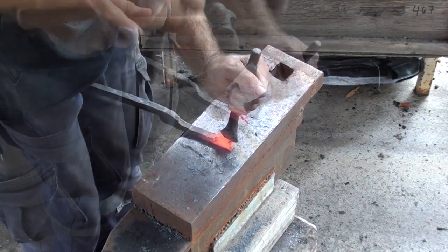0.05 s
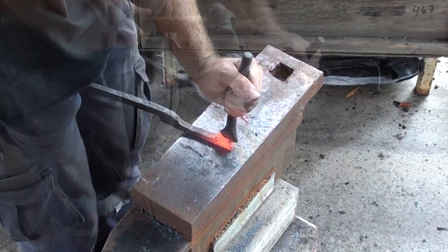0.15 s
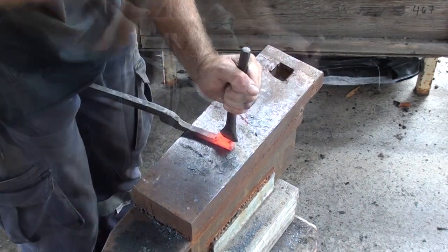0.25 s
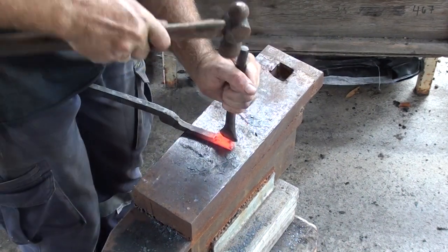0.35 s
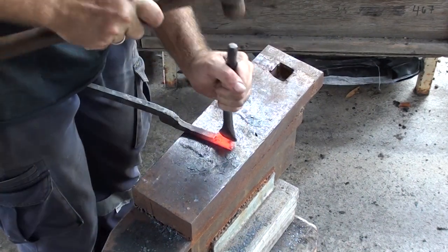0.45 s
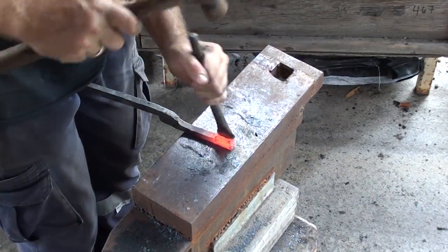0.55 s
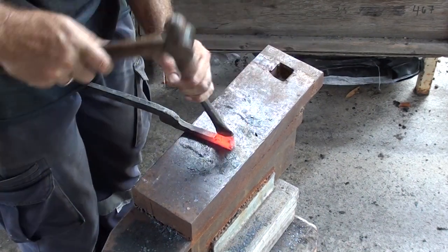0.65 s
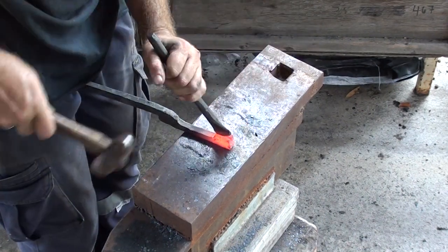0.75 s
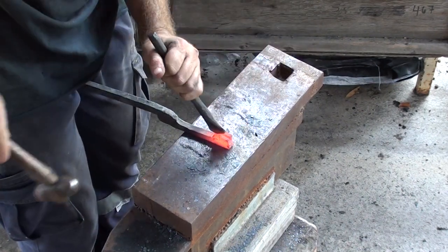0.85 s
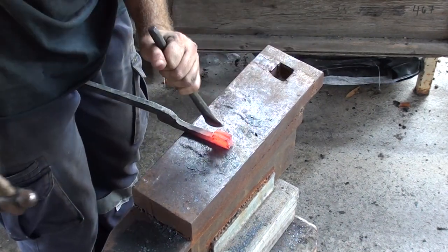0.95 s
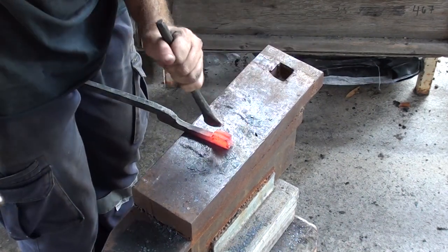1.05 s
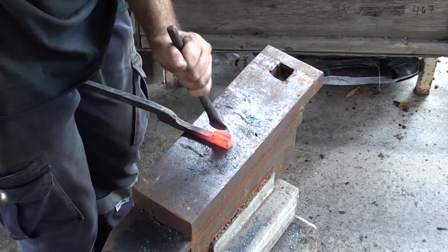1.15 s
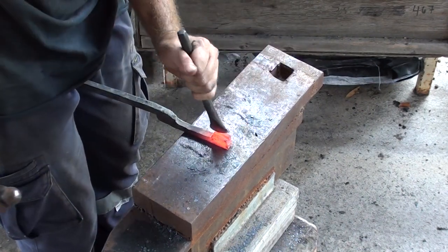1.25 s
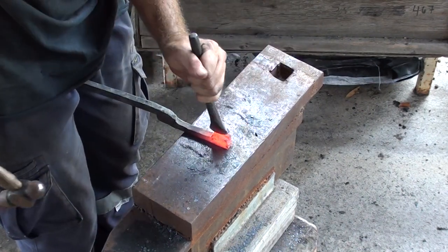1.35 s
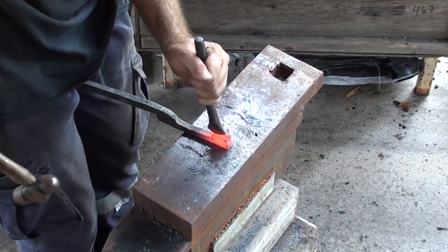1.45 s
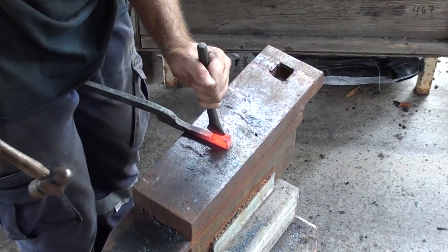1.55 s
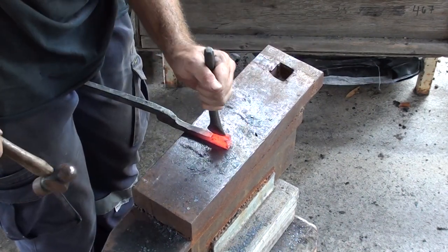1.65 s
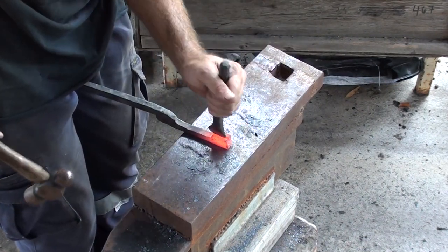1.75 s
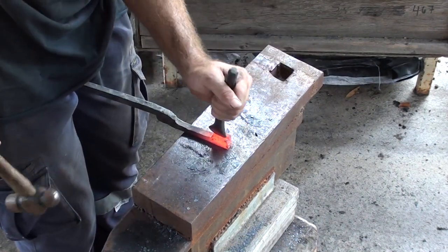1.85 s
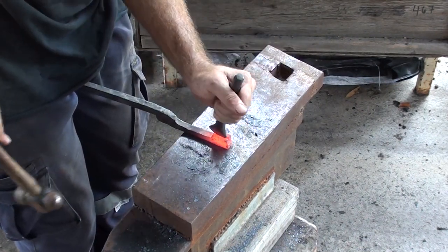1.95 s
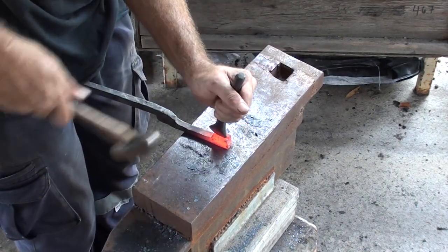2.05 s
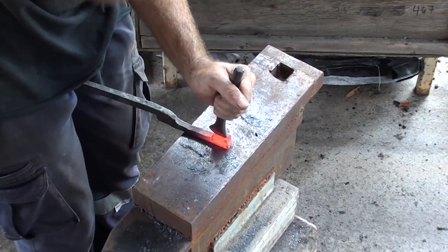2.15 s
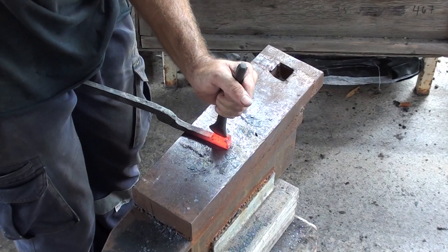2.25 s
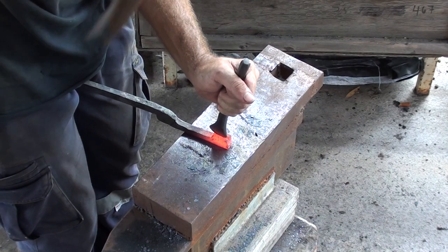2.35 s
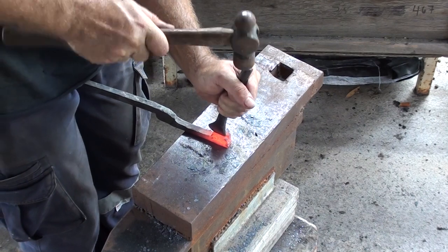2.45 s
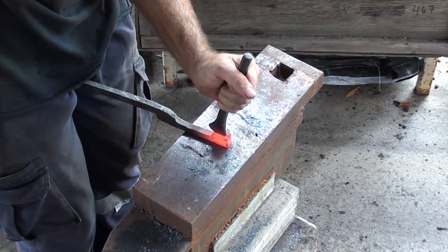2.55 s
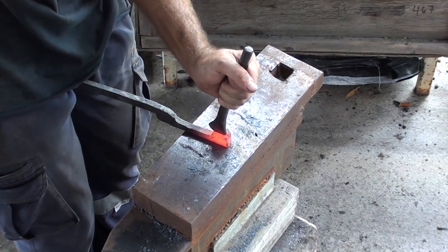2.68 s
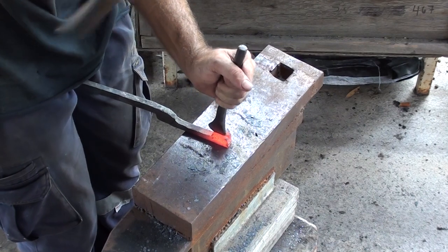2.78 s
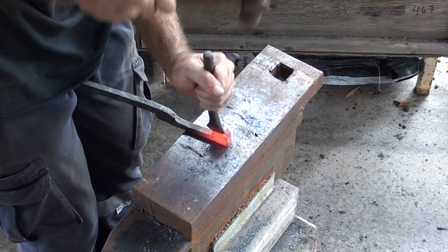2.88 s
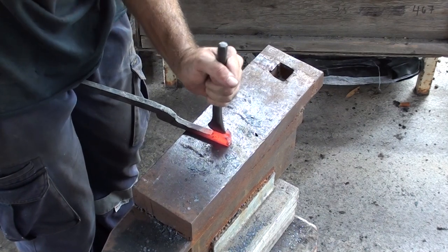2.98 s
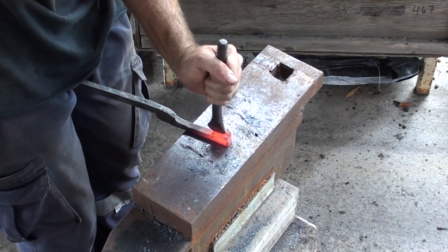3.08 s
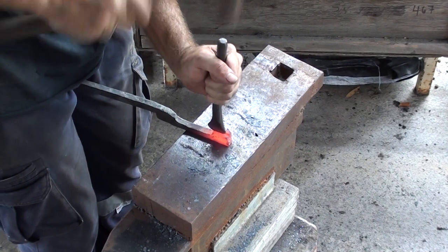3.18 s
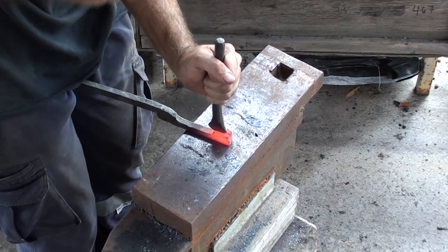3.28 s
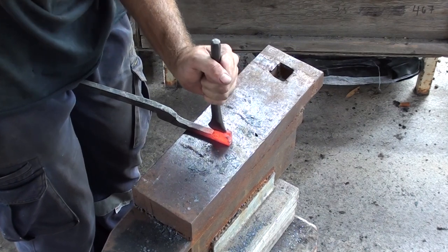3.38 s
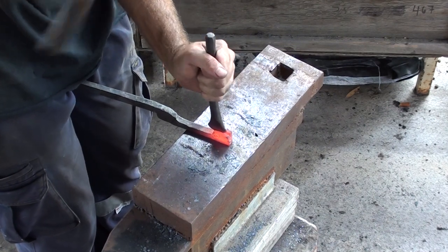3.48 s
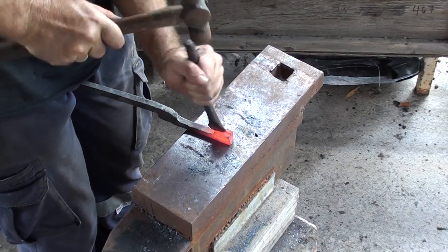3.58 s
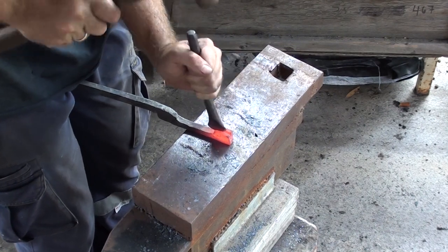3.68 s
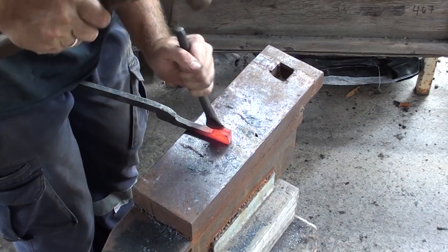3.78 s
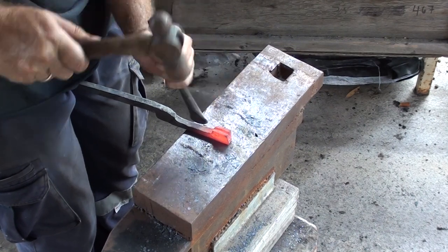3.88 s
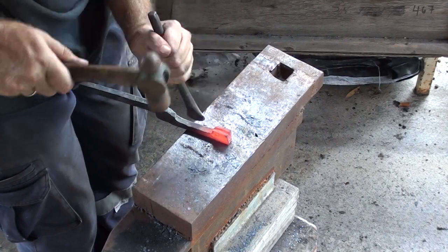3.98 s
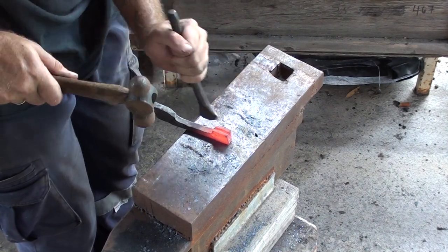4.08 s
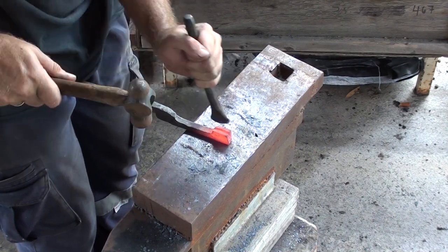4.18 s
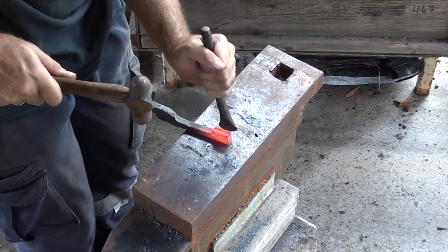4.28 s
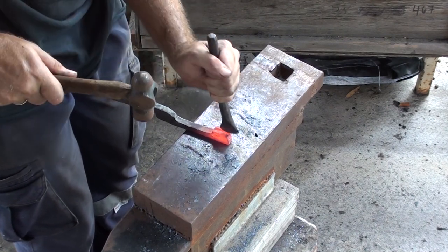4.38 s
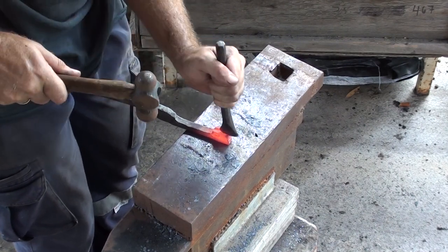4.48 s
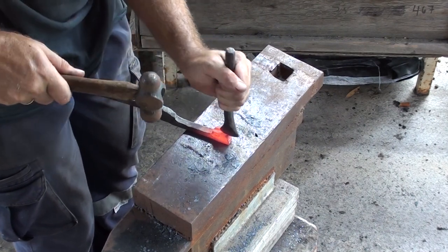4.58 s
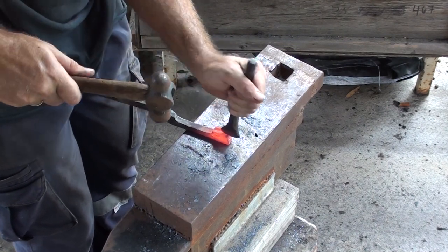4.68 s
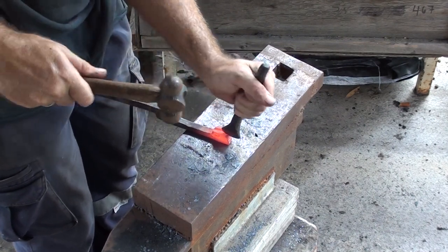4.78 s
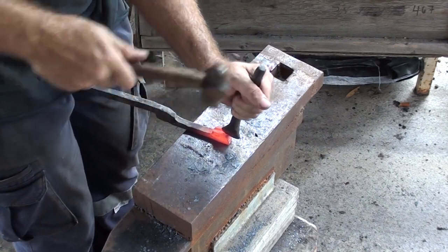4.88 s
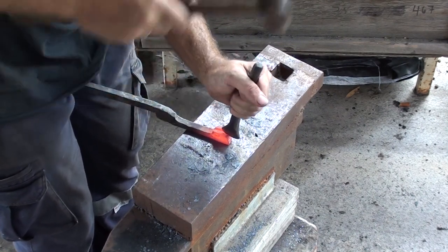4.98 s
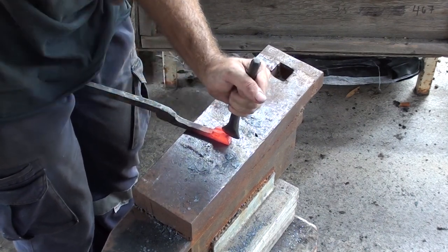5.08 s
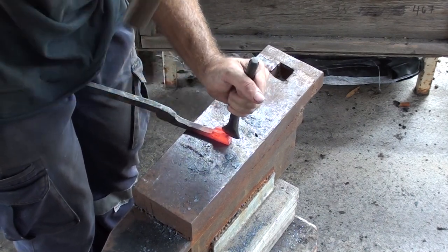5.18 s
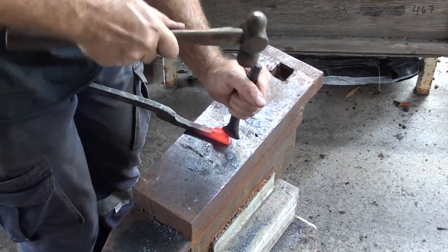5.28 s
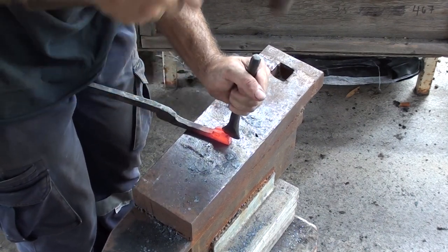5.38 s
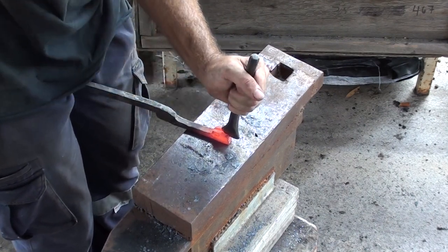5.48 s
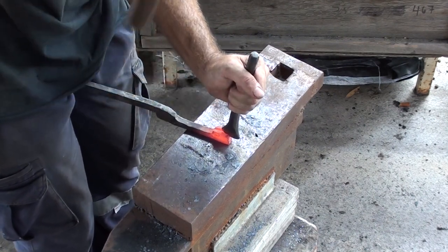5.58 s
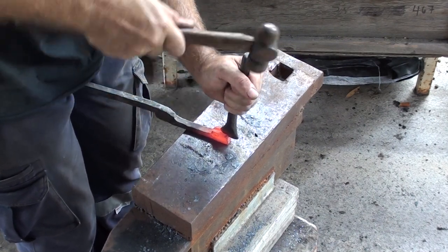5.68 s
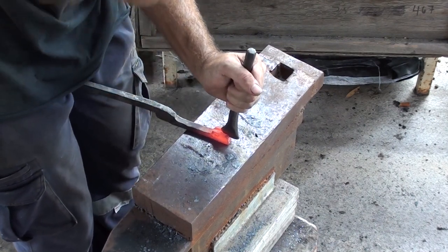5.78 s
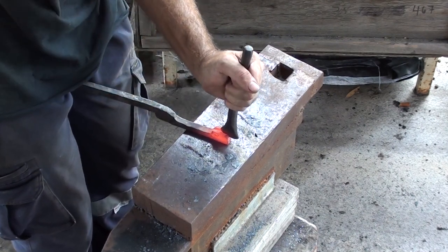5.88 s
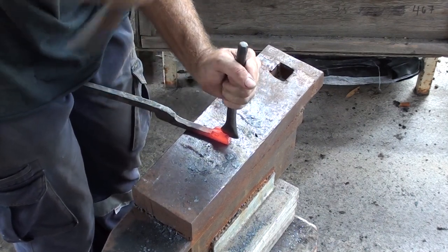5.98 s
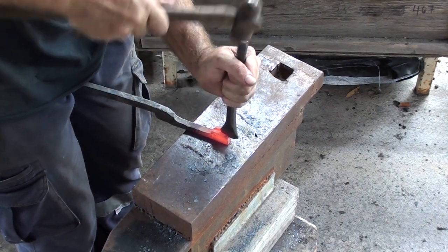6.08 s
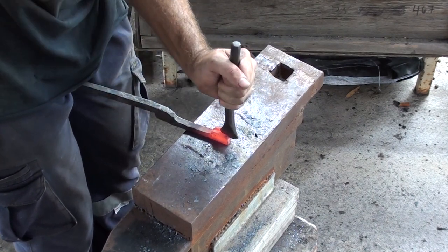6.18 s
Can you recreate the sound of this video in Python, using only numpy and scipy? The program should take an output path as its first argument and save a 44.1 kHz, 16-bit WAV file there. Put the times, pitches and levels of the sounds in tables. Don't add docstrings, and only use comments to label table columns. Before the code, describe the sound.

In a hard-walled workshop, a hammer hits a chisel on hot steel and anvil. Two loud ringing blows open, then a pause with tiny squeaks, light taps and soft drags as the chisel is repositioned. Four evenly spaced blows follow, another pause with faint knocks, then three more. Each crack echoes briefly. High insect chorus, low room hiss and a slowly growing blower hum lie behind. Close stereo microphone, heavily limited on the blows.

```python
import sys
import numpy as np
from scipy import signal
from scipy.fft import rfft, irfft, next_fast_len
from scipy.io import wavfile
from scipy.ndimage import uniform_filter1d

SR = 44100
rng = np.random.default_rng(int(sys.argv[2]) if len(sys.argv) > 2 else 0)


def decibels_to_gain(level_db):
    exponent = np.asarray(level_db, float) / 20
    return 10 ** exponent


def wav_record(signal):
    frames = np.transpose(np.atleast_2d(signal))
    bounded = np.clip(frames, -1, 1)
    quanta = np.round(bounded * 32767).astype(np.int16)
    wavfile.write(sys.argv[1], SR, quanta)


N = 275179
LEAD = 4410


def hammer():
    # start in seconds, strength in dB, then dB above usual passed into the anvil,
    # along the chisel and across the chisel.
    blows = [
        (-.012, -2, 5, 2, -4.5),
        (0.353, -4.5, 8.5, -2.5, -8),
        (2.476, -1.5, -0.5, 4, 6),
        (2.862, -2.5, -4, -3, -20.5),
        (3.231, -5, -5.5, -13.5, -17.5),
        (3.585, -5, 6, 0.5, -4.5),
        (5.309, -4, -1.5, 16, 9),
        (5.691, -4.5, 4.5, -10, -10.5),
        (6.064, -3.5, -0.5, 2, -17),
    ]
    rings, mid, side = np.zeros((3, N + LEAD))
    t = np.arange(SR) / SR
    for start, strength_db, *landing_db in blows:
        force = decibels_to_gain(strength_db + 6.5) * np.minimum(t / 0.00045, 1)
        crack, echoes = crack_and_echoes(landing_db, t)
        sustain, pairs = paired_rings(landing_db, t)
        add(rings, start, force * (pairs + overtones(t)))
        add(mid, start, force * (crack + echoes[0] + sustain))
        add(side, start, force * (echoes[1] + decibels_to_gain(-22) * sustain))
    return shop(rings, wet_db=-4.5) + spread(mid[LEAD:], side[LEAD:])


def crack_and_echoes(landing_db, t):
    # frequency in Hz, level in dB per Hz.
    crack_colour = [(60, -33), (130, -17), (250, -27.5), (480, -10), (850, -6.5), (1500, -13.5),
                    (2050, 1.5), (2700, -5), (3500, -1), (5200, -11), (7200, 2.5), (10500, -11),
                    (13500, -14.5), (15500, -33), (16500, -36)]
    # centre in Hz, half width in Hz.
    bands = [(3870, 360), (5286, 670), (6850, 120), (10800, 320), (8700, 600)]
    # usual level in dB, then the share (no unit)
    band_shares = [(1.3, -0.38, .02, 0.14), (9, .1, 0.15, -0.23), (3.4, -0.051, .01, 0.55),
                   (5, -0.21, 0.89, -0.54), (1.5, -0.16, 0.65, -0.45)]
    hz = np.geomspace(50, 20000, num=120)
    shade = read(crack_colour, hz)
    for band_db, (centre_hz, half_width_hz) in zip(np.dot(band_shares, [1] + landing_db), bands):
        shade = shade + band_db * np.exp(-((hz - centre_hz) / half_width_hz) ** 2)
    brighter = np.column_stack([hz, shade + 14 * hz / 1e4])
    crack = evened(colour(rng.standard_normal(SR), brighter))
    crack_t60 = 0.016
    return crack * decibels_to_gain(5.5 - 60 * t / crack_t60), tail(np.column_stack([hz, shade]))


def paired_rings(landing_db, t):
    ring_hz = [581, 1917, 2396, 8797, 1258, 1695, 3866, 10900]
    # usual level in dB, seconds to fall by 60 dB, then the partner's distance above in Hz,
    # its level in dB and its seconds to fall by 60 dB.
    ring_pairs = [(-20.5, 0.57, -3.5, 5, 0.32), (-5, .42, 1.55, -1, .44), (-13.5, 0.57, -3, 9, 0.3),
                  (-10, 0.3, -24, -4, 0.27), (-16.5, 0.17, -17, -7, 0.15), (-14.5, 0.078, -15, 0, 0.047),
                  (-19, 0.34, -3.5, 5.5, 0.17), (-10, 0.11, 53, -22, 0.11)]
    ring_shares = [(-0.041, -0.13, 0.091), (0.065, -0.26, 0.37), (0.69, -0.15, 0.091), (0.073, 0.99, -0.28),
                   (-0.1, 0.11, -0.1), (-0.63, 0.081, 0.29), (0.13, -0.22, 0.13), (0.26, 0.089, -0.25)]
    bloom_s = [0.035, 0.05, 0.054, 0.0013]
    usual_db, t60, split_hz, partner_db, partner_t60 = np.transpose(ring_pairs)[:, :, None]
    turns = np.transpose([ring_hz]) * t + rng.random((len(ring_pairs), 1))
    pairs = decibels_to_gain(-60 * t / t60) * np.sin(2 * np.pi * turns)
    pairs += decibels_to_gain(partner_db - 60 * t / partner_t60) * np.sin(2 * np.pi * (turns + split_hz * t))
    pairs *= decibels_to_gain(usual_db + np.dot(ring_shares, landing_db)[:, None])
    swell = 1 - np.exp(-t / np.transpose([bloom_s]))
    return (pairs[:4] * swell).sum(0), pairs[4:].sum(0)


def overtones(t):
    overtone_hz = [461, 532, 887, 951, 2020, 2082, 2294, 2853, 3403, 3655, 5089, 6800]
    # level in dB, seconds to fall by 60 dB.
    overtone_rings = [(-29.5, 0.15), (-30, 0.11), (-22, 0.23), (-10.5, 0.11), (-13, 0.063), (-11.5, 0.18),
                      (-21, 0.28), (-48, 0.057), (2, 0.012), (-11, 0.079), (-15, 0.24), (-44, 0.05)]
    return ring(overtone_hz, *np.transpose(overtone_rings), t)


def taps():
    # start in seconds, level of the lower rings, upper ring and edge in dB.
    knocks = [
        (1.29, -29, -46, -32),
        (1.295, -25, -44, -19.5),
        (1.307, -32, -30.5, -31),
        (1.52, -30.5, -50, -25),
        (1.522, -33.5, -45, -44),
        (4.417, -27, -37, -26),
        (4.421, -25, -50, -33),
        (4.498, -39, -44, -33.5),
        (4.51, -30, -45, -48),
    ]
    tap_hz = [420, 982, 1265, 1780, 2050, 2500, 2750, 3300, 3690, 4200, 7700, 11300]
    # usual level in dB, seconds to fall by 60 dB.
    tap_rings = [(-4, 0.037), (3, 0.1), (4, .19), (-5, 0.042), (-5, 0.041), (-8, 0.067), (-8, 0.032),
                 (3.5, .012), (0.5, 0.028), (0.5, 0.016), (-2, 0.015), (-27, 0.011)]
    out, t = np.zeros(N + LEAD), np.arange(8000) / SR
    usual_db, t60 = np.transpose(tap_rings)
    for start, lower_db, upper_db, edge_db in knocks:
        puff = decibels_to_gain(edge_db - 8.5 - 60 * t / 0.0093) * rng.standard_normal(len(t))
        part_db = [lower_db, lower_db, upper_db] + [edge_db] * 9
        knock = ring(tap_hz, usual_db + part_db, t60, t)
        add(out, start, decibels_to_gain(-12.5) * (knock + puff) * np.minimum(t / 0.0011, 1))
    return out


def rubbing():
    # start in seconds, length in seconds, level in dB.
    squeaks = [
        (.882, .004, -57),
        (.902, .006, -48),
        (.922, .004, -55),
        (.962, .01, -62),
    ]
    drags = [
        (1.33, 0.033, -63),
        (1.49, .03, -58),
        (1.6, 0.079, -59.5),
        (1.72, .15, -55),
        (4.5, .1, -54),
    ]
    # frequency in Hz, width in Hz, level in dB.
    squeak_parts = [(3830, 60, 1), (7250, 400, -7), (11000, 250, -11)]
    drag_parts = [(1490, 140, -9), (1627, 120, -12), (3810, 900, -7)]
    slips = rng.standard_normal(N)
    squeak = sum(decibels_to_gain(db) * resonate(slips, hz, width) for hz, width, db in squeak_parts)
    drag = sum(decibels_to_gain(db) * resonate(slips, hz, width) for hz, width, db in drag_parts)
    squeak = squeak * strokes(squeaks, rise_db=800, fall_db=810)
    return squeak + drag * strokes(drags, rise_db=200, fall_db=105)


def strokes(rows, rise_db, fall_db):
    t = np.arange(N) / SR
    start, length, db = np.transpose(rows)[:, :, None]
    before, after = np.maximum(start - t, 0), np.maximum(t - start - length, 0)
    return decibels_to_gain(db - rise_db * before - fall_db * after).sum(0)


def insects():
    # frequency in Hz, level in dB per Hz.
    chorus_colour = [(2820, -53), (4800, -14.5), (5380, -8.5), (5770, -8), (6230, -6.5), (7150, -11.5),
                     (7780, -7), (8300, -7), (8930, -9), (9670, -28), (11000, -44), (14300, -51),
                     (22000, -120)]
    # time in seconds, depth in Hz.
    dips = [
        (1.4, 400),
        (1.82, 250),
        (4.33, 420),
        (4.6, 150),
        (4.91, 450),
    ]
    t = np.arange(N) / SR
    dip_hz = sum(depth * np.exp(-((t - s) / 0.063) ** 2) for s, depth in dips)
    steady = evened(colour(rng.standard_normal(N), chorus_colour))
    f, frames, z = signal.stft(steady, SR, nperseg=256)
    patches = uniform_filter1d(uniform_filter1d(rng.standard_normal(z.shape), 3, 0), 25, 1)
    chorus = signal.istft(z * decibels_to_gain(1.7 * evened(patches)), SR, nperseg=256)[1][:N]
    throb = decibels_to_gain(1.3 * evened(uniform_filter1d(rng.standard_normal(N), 500)))
    singer = resonate(throb * rng.standard_normal(N), 5270 - dip_hz, 550)
    singer_db = -6.5 + 13.5 * dip_hz / 1000
    return decibels_to_gain(-55) * (chorus + decibels_to_gain(singer_db) * singer)


def blower_hum():
    # time in seconds, level in dB.
    hum_level = [
        (0, -75),
        (1.5, -80),
        (2.4, -60.5),
        (4.1, -64),
        (4.6, -59.5),
        (6.24, -56.5),
    ]
    level_db = np.interp(np.arange(N) / SR, *np.transpose(hum_level))
    return decibels_to_gain(level_db) * resonate(rng.standard_normal(N), 459.5, 21)


def room_hiss():
    # frequency in Hz, level in dB per Hz.
    hiss_colour = [(25, -12), (38, -8), (52, -8), (75, -5), (110, -2), (200, -8), (500, -5), (1000, -10.5),
                   (2000, -16), (4000, -21.5), (10000, -24.5), (15500, -28.5)]
    return decibels_to_gain(-52.5) * evened(colour(rng.standard_normal(N), hiss_colour))


def background():
    song = insects()
    mid = room_hiss() + blower_hum() + song
    return spread(mid, room_hiss() + decibels_to_gain(3.5) * np.roll(song, 3000))


def shop(x, wet_db):
    echo = tail([(20, 0), (20000, 0)])
    echo = echo / np.linalg.norm(echo[0])
    wet = decibels_to_gain(wet_db) * signal.fftconvolve(x[None], echo, axes=1)
    return spread(x[LEAD:] + wet[0, LEAD:LEAD + N], wet[1, LEAD:LEAD + N])


def tail(points):
    # frequency in Hz, seconds to fall by 60 dB.
    shop_t60 = [(250, 0.35), (660, 0.44), (1740, 0.37), (4590, 0.35), (12100, 0.29)]
    noise = evened(colour(rng.standard_normal((2, SR)), points))
    hz, t, z = signal.stft(noise, SR, nperseg=256)
    dying = z * decibels_to_gain(-60 * t / read(shop_t60, hz)[:, None])
    out = signal.istft(dying, SR, nperseg=256)[1][:, :SR]
    return out * np.minimum(np.arange(SR) / (0.011 * SR), 1)


def spread(mid, side):
    # frequency in Hz, level of side against middle in dB.
    side_level = [(60, -38), (110, -35), (200, -15), (380, -15.5), (700, -15.5), (1290, -14), (2380, -9.5),
                  (4400, -14.5), (8800, -12.5), (9600, -14)]
    side = colour(side, side_level)
    return np.array([mid + side, mid - side])


def ring(hz, db, t60, t):
    hz, db, t60 = np.array([hz, db, t60])[:, :, None]
    sines = np.sin(2 * np.pi * (hz * t + rng.random(hz.shape)))
    return (decibels_to_gain(db - 60 * t / t60) * sines).sum(0)


def resonate(x, hz, width):
    turn = np.exp(2j * np.pi * np.cumsum(hz * np.ones(len(x))) / SR)
    r = np.exp(-np.pi * width / SR)
    smooth = signal.lfilter([1], [1, -2 * r, r * r], x / turn)
    return evened((turn * smooth).real)


def colour(x, points):
    size = next_fast_len(x.shape[-1])
    shape = decibels_to_gain(read(points, np.fft.rfftfreq(size, 1 / SR)))
    return irfft(rfft(x, size) * shape, size)[..., :x.shape[-1]]


def read(points, hz):
    f, value = np.transpose(points)
    return np.interp(np.log(hz + 1), np.log(f + 1), value)


def evened(x):
    return x / np.sqrt(np.mean(x ** 2) + 1e-20)


def add(mix, start, sound):
    part = mix[LEAD + round(start * SR):][:len(sound)]
    part += sound[:len(part)]


def scene():
    near = rubbing()
    return hammer() + shop(taps(), wet_db=-8.5) + spread(near, near) + background()


def limiter(dry):
    power_db = 10 * np.log10(abs(uniform_filter1d((dry ** 2).mean(0), 180)) + 1e-12)
    fall = np.arange(N) * 194.0 / SR
    over_db = np.maximum.accumulate(power_db + fall) - fall + 12.0
    cut_db = 2.4 * np.logaddexp(0, over_db / 2.5)
    quiet_s = (np.arange(N) - np.maximum.accumulate(np.arange(N) * (cut_db > 1))) / SR
    return dry / decibels_to_gain(uniform_filter1d(cut_db - 1.5 * quiet_s, 60)), over_db


def band_limit(x):
    return signal.sosfilt(signal.butter(12, 15850, fs=SR, output="sos"), x)


def record(dry):
    # time in seconds, level in dB.
    fade_in = [
        (0, -6),
        (.5, -1.24),
    ]
    held, over_db = limiter(dry)
    held = signal.sosfilt(signal.butter(2, 45, "high", fs=SR, output="sos"), np.tanh(held))
    held = signal.oaconvolve(held, signal.firwin(255, 16500, fs=SR)[None], "same")
    top = signal.oaconvolve(held, signal.firwin(255, 14600, pass_zero=False, fs=SR)[None], "same")
    loud = over_db > -22
    busy = loud & np.roll(loud, 1300)
    held = held - top * uniform_filter1d(busy * 1., 400)
    held = held * decibels_to_gain(np.interp(np.arange(N) / SR, *np.transpose(fade_in)))
    return band_limit(held)


dry = scene()
out = record(dry)
wav_record(out)
```